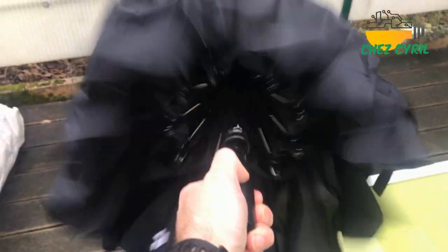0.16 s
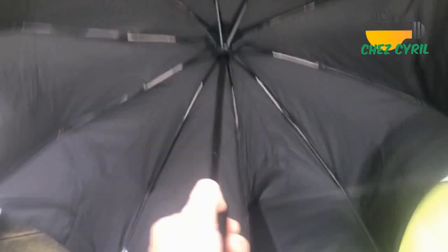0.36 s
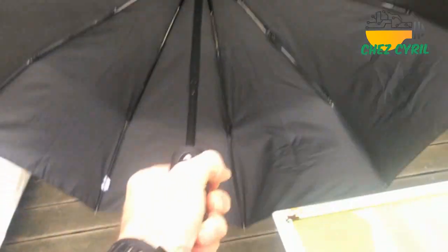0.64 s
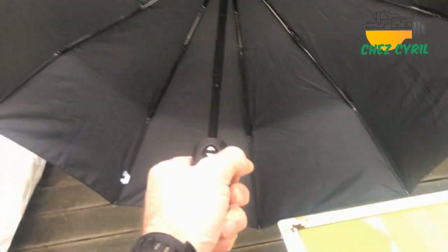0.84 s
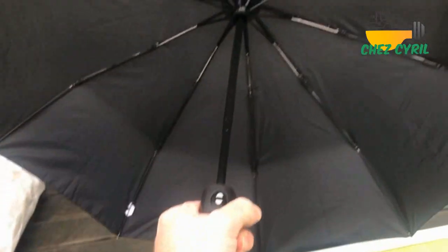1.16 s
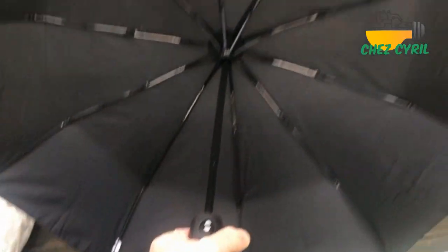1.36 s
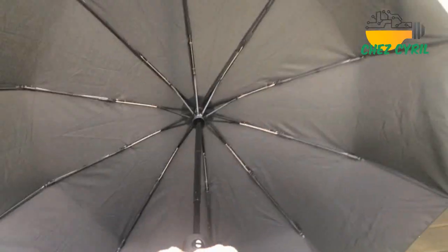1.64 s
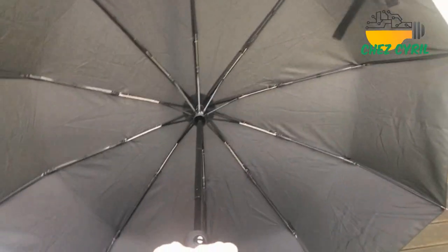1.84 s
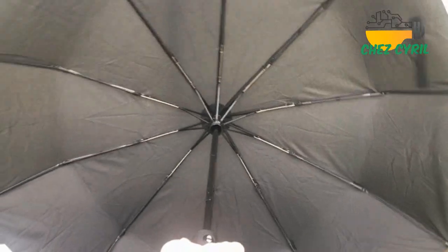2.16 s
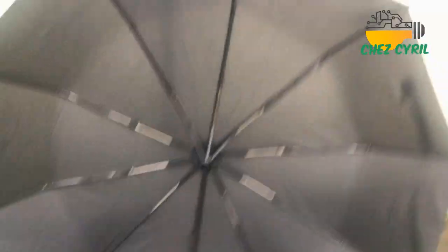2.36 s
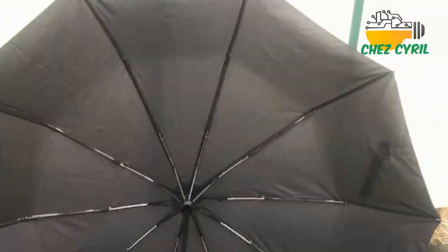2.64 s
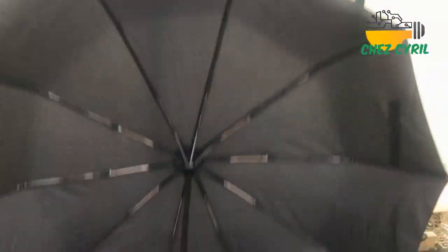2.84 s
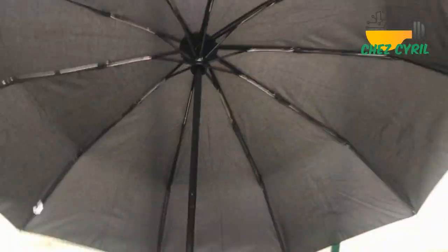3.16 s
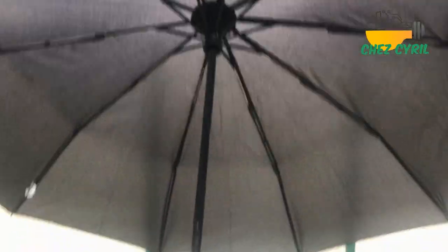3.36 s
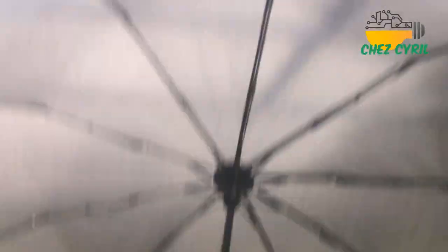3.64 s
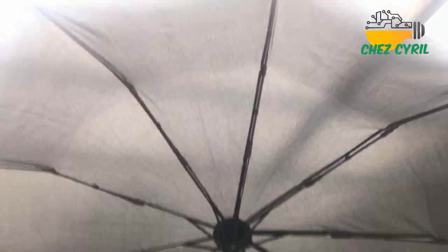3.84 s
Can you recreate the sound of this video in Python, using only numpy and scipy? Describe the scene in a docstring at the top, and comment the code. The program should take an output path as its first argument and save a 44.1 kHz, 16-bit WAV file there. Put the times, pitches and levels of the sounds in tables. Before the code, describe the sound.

A folding umbrella springs open at arm's length: a metal catch snaps, ribs clatter, and nylon rustles and thumps taut. Then outdoor wind keeps buffeting the microphone, with a few faint ticks from the frame.

```python
"""Wind buffets the microphone over a distant outdoor hum; a folding umbrella opens at arm's length.
Its steel catch snaps and rings, the ribs clatter, the shaft shoots out against its stop, and the
nylon rustles, flaps and thumps taut. Then gusts and single eddies keep knocking on the microphone,
the canopy brushes softly as it is raised, and the frame gives a few faint ticks."""
import sys
import numpy as np
from scipy import signal
from scipy.fft import rfft, irfft
from scipy.io import wavfile
from scipy.ndimage import uniform_filter1d, map_coordinates

SR = 44100
rng = np.random.default_rng(int(sys.argv[2]) if len(sys.argv) > 2 else 0)


def transcribe(signal):
    """Save signal, clipped to [-1, 1], as a 16-bit WAV file at the path in sys.argv[1]."""
    frames = np.atleast_2d(signal).T
    limited = np.clip(frames, -1, 1)
    pcm = np.round(limited * 32767).astype(np.int16)
    wavfile.write(sys.argv[1], SR, pcm)


N = 176400
TIME = np.arange(N) / SR
FREQ = np.maximum(np.arange(N // 2 + 1) * SR / N, 1)


def undb(db):
    """Decibels to gain."""
    return 10 ** (np.asarray(db) / 20)


def unit(x):
    """Scale to rms 1."""
    return x / np.sqrt(np.mean(x ** 2))


def noise():
    """White noise."""
    return rng.standard_normal(N)


def shape(x, gain):
    """Filter by a gain per frequency, then scale to rms 1."""
    return unit(irfft(rfft(x) * gain, N))


def colour(points, tilt_db=0):
    """Gain per frequency from (f/Hz, level/dB) points, tilted per octave."""
    hz, db = np.array(points).T
    return undb(np.interp(np.log(FREQ), np.log(hz), db) + tilt_db * np.log2(FREQ))


def curve(points):
    """Gain over time from (t/s, level/dB) points."""
    return undb(np.interp(TIME, *np.array(points).T))


def wander(hz):
    """Random drift of rms 1, mostly slower than hz."""
    return shape(noise(), 1 / (1 + (FREQ / hz) ** 2) ** 2)


def swell(start, length, attack_s, release_s):
    """Smooth rise, hold, exponential release."""
    rise = np.sin(np.pi / 2 * np.clip((TIME - start) / attack_s + .5, 0, 1)) ** 2
    return rise * np.exp(-np.clip((TIME - start - length) / release_s, 0, 20))


def arch(start, length):
    """Half a sine from start over length."""
    return np.sin(np.pi * np.clip((TIME - start) / length, 0, 1))


def strike(start, t60, contact_s=0.00046):
    """Envelope of a blow: a rise over the contact time, then exponential decay."""
    rise = np.clip((TIME - start) / contact_s, 0, 1)
    return rise * np.exp(-np.log(1000) * np.clip((TIME - start) / t60, 0, 2))


# spectrum of the far background: f/Hz, relative level/dB
HUM_SPECTRUM = [(40, 4.5), (200, 10), (450, 0.5), (750, 1.5), (1200, 0), (2000, -8), (3500, -14.5),
                (6000, -19.5), (10000, -26.5), (15500, -28.5)]
# its strength at the microphone: t/s, level/dB
HUM_LEVEL = [(0, -53.5), (1.7, -56), (2.6, -55), (4, -57.5)]


def distant_hum():
    """Open air: a smooth, far-off hum that sinks slightly."""
    return shape(noise(), colour(HUM_SPECTRUM)) * curve(HUM_LEVEL)


# weak breeze at the microphone: t/s, level/dB
BREEZE_LEVEL = [(0, -35.5), (1.6, -38), (2.66, -39.5), (2.78, -49.5), (3.45, -42.5), (3.85, -47.5)]
# gusts right on the microphone: t/s, length/s, level/dB, upper edge f/Hz
MIC_GUSTS = [(0.052, 0.048, -28.5, 209.3), (0.139, 0.061, -25.5, 149), (0.426, 0.0502, -29.5, 208.2),
             (0.621, 0.056, -28, 175), (0.706, 0.072, -31.5, 161.6), (0.853, 0.056, -24, 214.8),
             (0.921, .07, -27.5, 239.3), (1.018, 0.1, -25, 273), (1.113, 0.095, -23.5, 296.3),
             (1.26, 0.05, -27.5, 265.2), (1.334, 0.064, -33.5, 216.4), (1.421, 0.061, -25, 378),
             (1.699, 0.065, -30, 178.4), (1.833, 0.0479, -34, 200.9), (1.907, 0.047, -34, 217.2),
             (2.13, 0.075, -29.5, 309.5), (2.359, 0.072, -28, 189.7), (2.936, 0.083, -37.5, 121.6),
             (3.282, 0.028, -34, 181), (3.473, 0.14, -33.5, 206)]
BREEZE_EDGE_HZ, WAKE_EDGE_HZ, WIND_ATTACK_S = 115.54, 186.3, 0.0125


def wind(swell_db=3, crest_db=3.5, crest_octaves=.25, wake_db=-9, flurry_octaves=0.3):
    """Breeze and gusts on the microphone, loudest and brightest at each crest; buffets trail a wake."""
    power = (curve(BREEZE_LEVEL) * undb(swell_db * wander(hz=13.32))) ** 2
    weighted_edge = power * BREEZE_EDGE_HZ
    for start, length, db, hz in MIC_GUSTS:
        crest = arch(start, length) - 2 / np.pi
        gust = (undb(db + crest_db * crest) * swell(start, length, WIND_ATTACK_S, release_s=.011)) ** 2
        power += gust
        weighted_edge += gust * hz * 2 ** (crest_octaves * crest)
    for start, db, _ in MIC_BUFFETS:
        wake = (undb(db + wake_db) * swell(start, 0, WIND_ATTACK_S, release_s=.032)) ** 2
        power += wake
        weighted_edge += wake * WAKE_EDGE_HZ
    flurries = 2 ** (flurry_octaves * wander(hz=57.9))
    return turbulence(weighted_edge / power * flurries) * np.sqrt(power)


def turbulence(edge_hz, tilt_db=-2.5, edge_order=3.52, low_hz=49.8, low_order=4.6, even_s=0.042):
    """Eddies of even strength carried past the microphone; faster air raises their upper edge."""
    lowpass = 1 / np.sqrt(1 + (FREQ / BREEZE_EDGE_HZ) ** (2 * edge_order))
    highpass = 1 / np.sqrt(1 + (low_hz / FREQ) ** (2 * low_order))
    air = shape(noise(), undb(tilt_db * np.log2(FREQ)) * lowpass)
    travel = np.cumsum(edge_hz / BREEZE_EDGE_HZ)
    passing = map_coordinates(air, [travel], order=3, mode="grid-wrap")
    end_fades = np.clip(np.minimum(TIME, TIME[-1] - TIME) / WIND_ATTACK_S, 0, 1)
    rumble = shape(passing * end_fades, highpass)
    window = int(even_s * SR)
    local_power = uniform_filter1d(uniform_filter1d(rumble ** 2, window), window // 2)
    return rumble / np.sqrt(local_power)


def creases(per_s, spread_db=4.5, hiss_db=-0.5):
    """Tiny snaps of uneven size over the smooth hiss of sliding cloth."""
    size = undb(spread_db * np.minimum(rng.exponential(size=N), 5))
    snaps = (rng.random(N) < per_s / SR) * size * np.sign(noise())
    return unit(snaps) + undb(hiss_db) * noise()


# spectrum of the nylon rustle, coloured by the microphone: f/Hz, relative level/dB
RUSTLE_SPECTRUM = [(250, 9.5), (500, -0.5), (1500, 0.5), (3200, -0.5), (4900, -3), (6500, -3), (9500, -4.5),
                   (10400, -7.5), (11200, -4), (15500, -8.5)]
# rustle of the opening canopy: t/s, level/dB
RUSTLE_LEVEL = [(.12, -66.5), (.143, -37), (.197, -35.5), (.22, -29.5), (.25, -30.5), (.29, -30),
                (.32, -36), (.345, -32), (.40, -33.5), (.42, -29.5), (.447, -38.5), (.47, -33.5),
                (.497, -46.5), (.58, -54), (.68, -57.5), (.728, -50), (.80, -86.5)]
# panels flapping out: t/s, length/s, level/dB, resonance f/Hz, bandwidth/Hz
PANEL_FLAPS = [(0.225, 0.0051, -28, 1140, 806), (0.289, 0.022, -35.5, 1370, 700),
               (0.309, 0.009, -28.5, 1440, 220), (0.322, 0.012, -33, 1180, 700),
               (0.408, 0.016, -35, 1100, 1200), (0.425, 0.012, -26.5, 770, 1100),
               (0.445, 0.03, -33, 1070, 895)]


def canopy_unfolding(creases_per_s=2400, flutter_db=0.6):
    """The nylon rustles at arm's length; each panel flaps out with a resonance of its own."""
    rustle = shape(creases(creases_per_s), colour(RUSTLE_SPECTRUM))
    out = rustle * curve(RUSTLE_LEVEL) * undb(flutter_db * wander(hz=122))
    cloth = creases(creases_per_s)
    for start, length, db, hz, width in PANEL_FLAPS:
        resonance = 1 / (1 + 1j * hz / width * (FREQ / hz - hz / FREQ))
        envelope = swell(start, length, attack_s=0.0028, release_s=0.0035)
        out += undb(db) * shape(cloth, resonance) * envelope
    return out


# spectrum of a frame knock, coloured by the microphone: f/Hz, relative level/dB
KNOCK_SPECTRUM = [(250, -7.5), (550, -8), (1600, -5.5), (2300, -8), (3400, -7.5), (5000, -15.5),
                  (6500, -12.5), (10300, -17.5), (15500, -16.5)]


def struck_steel(blows, modes, crack_t60_s, crack_db=-2.5):
    """Each blow gives a short crack and rings the modes of a steel part."""
    modes_rms = np.sqrt(sum(undb(db) ** 2 for _, db, _ in modes) / 2)
    out = np.zeros(N)
    for start, db in blows:
        ring = np.zeros(N)
        for hz, mode_db, t60 in modes:
            phase = 2 * np.pi * (hz * (TIME - start) + rng.random())
            ring += undb(mode_db) * strike(start, t60) * np.sin(phase)
        crack = shape(noise(), colour(KNOCK_SPECTRUM)) * strike(start, crack_t60_s)
        out += undb(db) * (ring / modes_rms + undb(crack_db) * crack)
    return out


# release and rebound of the catch: t/s, level/dB
CATCH_BLOWS = [(.1383, -15), (.1404, -25)]
# its steel modes: f/Hz, relative level/dB, t60/s
CATCH_RING = [(2530, -0.5, 0.016), (2840, 5.5, 0.0093), (3420, 4, 0.02), (5040, -0.5, 0.024),
              (8650, 1, 0.012), (12930, 0, 0.018)]


def catch():
    """The catch lets go and rebounds, an arm's length from the microphone."""
    return struck_steel(CATCH_BLOWS, CATCH_RING, crack_t60_s=0.0081)


# rib joints knocking close by: t/s, level/dB, t60/s, tilt/(dB per octave)
RIB_KNOCKS = [(0.166, -20.5, 0.041, 1.5), (0.2108, -22, 0.019, 1), (0.2352, -10.5, 0.0056, 0.5),
              (0.295, -21.5, 0.006, -2), (0.3677, -28, 0.052, -2), (0.3932, -26, 0.013, -4.5),
              (0.4299, -16, 0.027, -4), (.4690, -17, 0.018, 12), (0.708, -33, 0.052, -0.5),
              (0.7119, -29, 0.011, -8.5), (3.079, -41.5, 0.019, -3), (3.119, -48, 0.021, 4.5),
              (3.165, -49, 0.015, -8)]


def ribs():
    """Loose joints knock as the frame spreads and settles, and tick faintly as it is moved."""
    return sum(undb(db) * strike(start, t60) * shape(noise(), colour(KNOCK_SPECTRUM, tilt))
               for start, db, t60, tilt in RIB_KNOCKS)


# shaft hitting its stop: t/s, level/dB
SHAFT_BLOWS = [(.3312, -15.5), (.3345, -21.5)]
# its tube modes: f/Hz, relative level/dB, t60/s
SHAFT_RING = [(1204, -6, 0.071), (1477, 8, 0.016), (2920, 2, 0.018), (4070, 2, 0.015), (11130, -4.5, 0.05),
              (15000, 9, .014)]


def shaft():
    """The tubes shoot out and ring as they reach their stop."""
    return struck_steel(SHAFT_BLOWS, SHAFT_RING, crack_t60_s=0.011)


def puffs(events, width_cycles, ragged_octaves=0.39):
    """Brief swings of air pressure with sharp crests, their pitch made ragged by the uneven flow."""
    flow_time = np.cumsum(2 ** (ragged_octaves * wander(hz=272))) / SR
    out = np.zeros(N)
    for time, db, hz in events:
        cycles = (flow_time - np.interp(time, TIME, flow_time)) * hz
        envelope = 1 / np.cosh(np.clip(cycles / width_cycles, -20, 20))
        out += undb(db) * envelope * np.sin(2 * np.pi * (cycles + rng.random()))
    return out


# thumps of the canopy close by: t/s, peak level/dB, f/Hz
CANOPY_THUMPS = [(0.401, -16.5, 211), (0.49, -13.5, 177)]


def canopy_taut():
    """The canopy shoves air at the microphone as it fills and pulls taut."""
    return puffs(CANOPY_THUMPS, width_cycles=0.66)


# soft strokes on the open canopy: t/s, length/s, level/dB, band centre f/Hz
CLOTH_STROKES = [(0.756, 0.15, -67.5, 6425), (0.935, 0.078, -66.5, 8500), (0.946, 0.6, -69, 6340),
                 (1.819, 0.063, -66.5, 7000), (2.938, 0.039, -65, 4000), (3.071, 0.092, -67, 10850),
                 (3.183, 0.27, -62, 12050), (3.384, 0.063, -59, 11180), (3.476, 0.058, -63, 4910),
                 (3.942, 0.05, -65, 7160)]


def canopy_brushing(width_octaves=1):
    """The cloth brushes as it is raised; each stroke swells and dies away with its own brightness."""
    cloth = shape(creases(per_s=380), colour(RUSTLE_SPECTRUM))
    out = np.zeros(N)
    for start, length, db, hz in CLOTH_STROKES:
        band = 1 / np.hypot(1, np.log2(FREQ / hz) / width_octaves)
        out += undb(db) * arch(start, length) * shape(cloth, band)
    return out


# single eddies right on the microphone: t/s, peak level/dB, f/Hz
MIC_BUFFETS = [(.865, -20.5, 214), (1.243, -18, 323), (1.454, -13, 279.8), (1.482, -18, 219.6),
               (2.144, -22.5, 207), (2.165, -22.5, 280), (2.25, -28, 220.1), (2.34, -19.5, 99.9),
               (2.363, -19.5, 209.4), (2.401, -24, 253), (2.543, -25.5, 111.8), (3.078, -21.5, 90),
               (3.349, -21, 75), (3.413, -23.5, 248.3), (3.428, -24.5, 63), (3.573, -20, 78),
               (3.713, -19, 149.6)]


def buffets():
    """Each eddy lands on the microphone as one low knock; wind() plays its wake."""
    return puffs(MIC_BUFFETS, width_cycles=0.46)


def scene():
    """One microphone outdoors: the umbrella at arm's length, wind on the capsule, hum far off."""
    umbrella = catch() + shaft() + ribs() + canopy_unfolding() + canopy_brushing() + canopy_taut()
    return (umbrella + buffets() + wind() + distant_hum())[None]


def record(dry, top_hz=15800):
    """The recorder cuts the top steeply."""
    return signal.sosfilt(signal.ellip(10, .2, 80, top_hz, fs=SR, output="sos"), dry)


dry = scene()
out = record(dry)
transcribe(out)
```